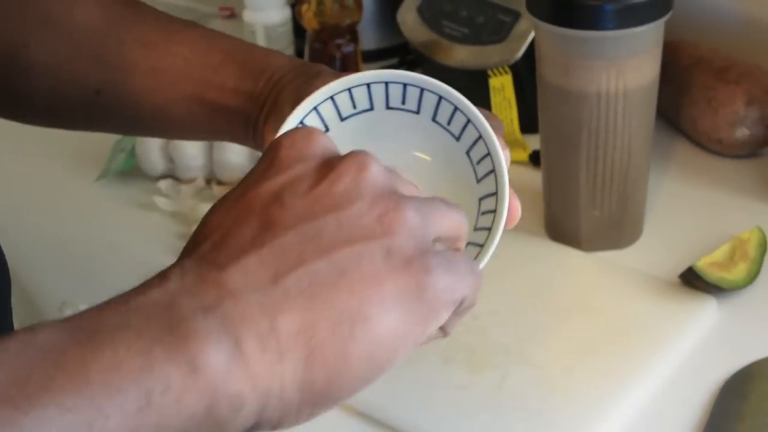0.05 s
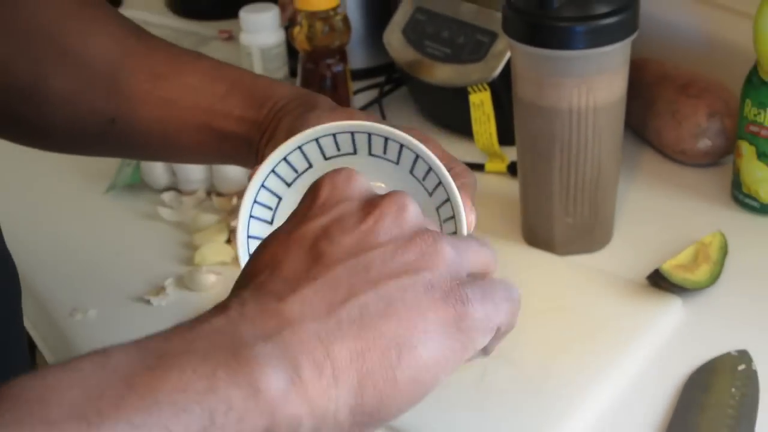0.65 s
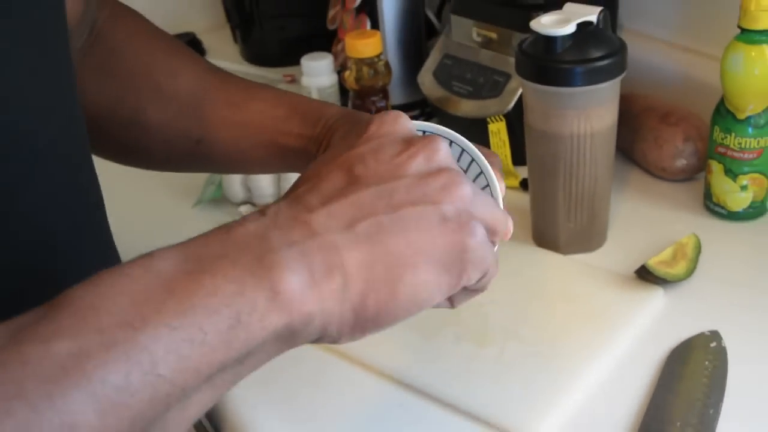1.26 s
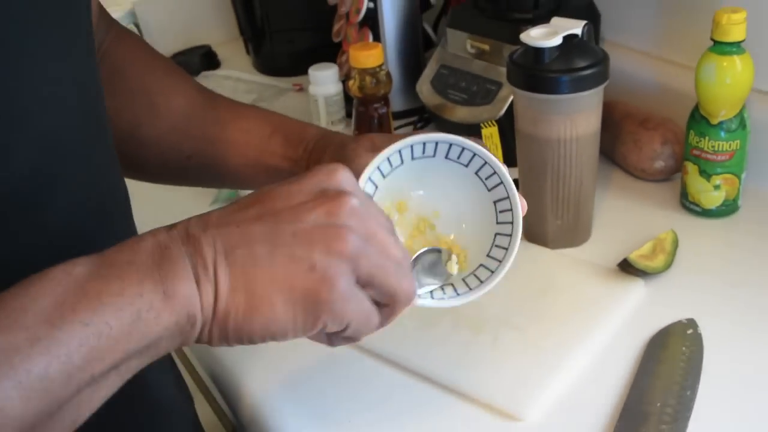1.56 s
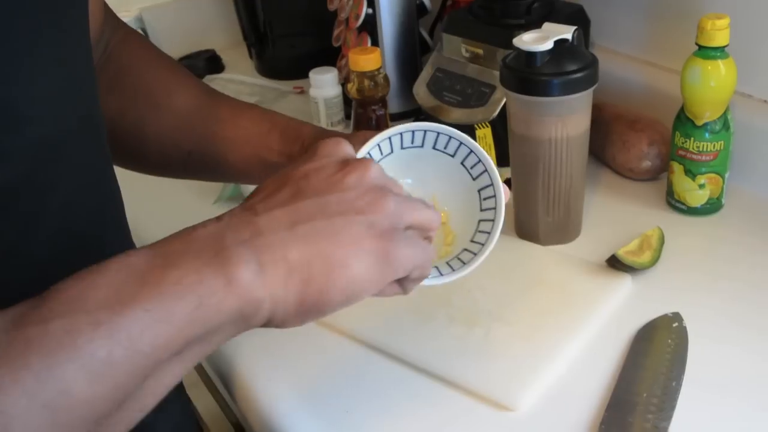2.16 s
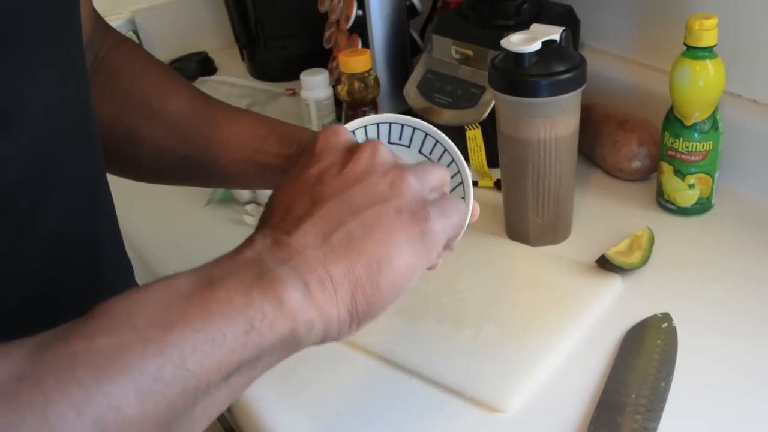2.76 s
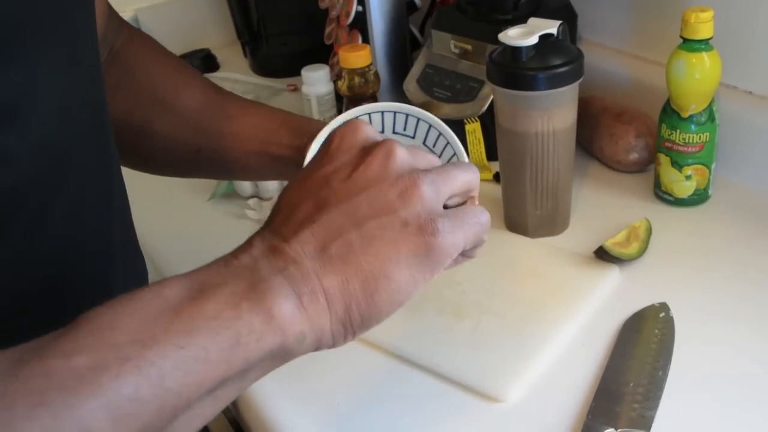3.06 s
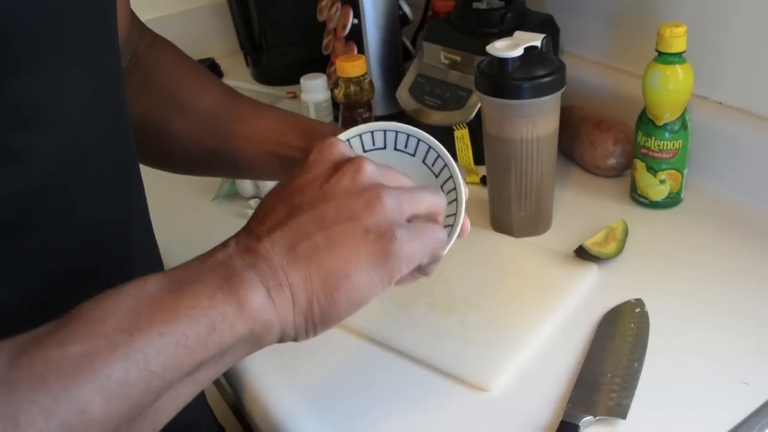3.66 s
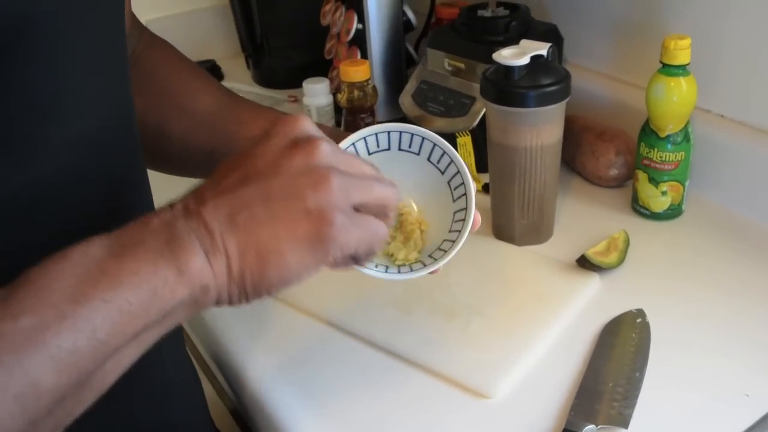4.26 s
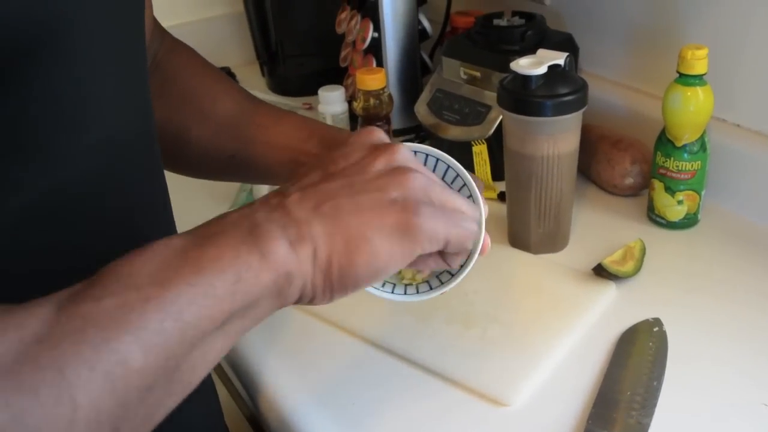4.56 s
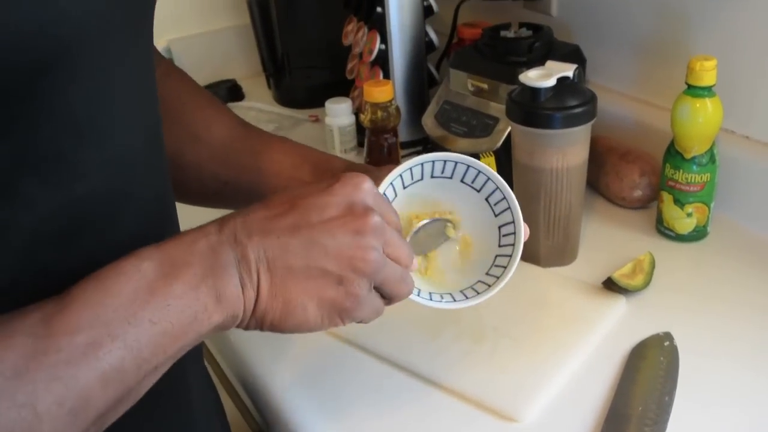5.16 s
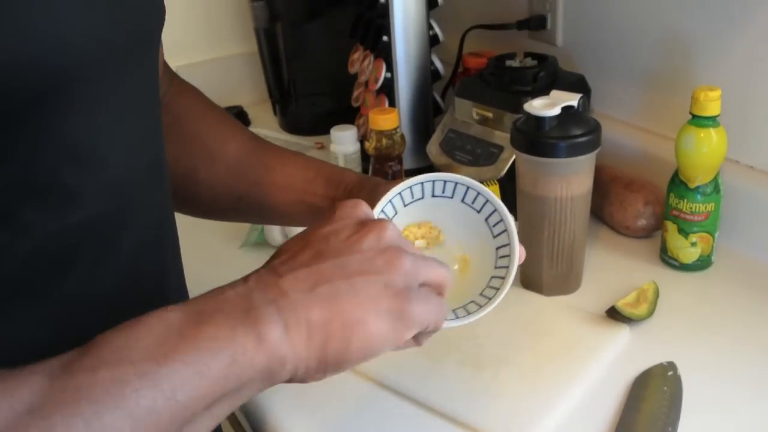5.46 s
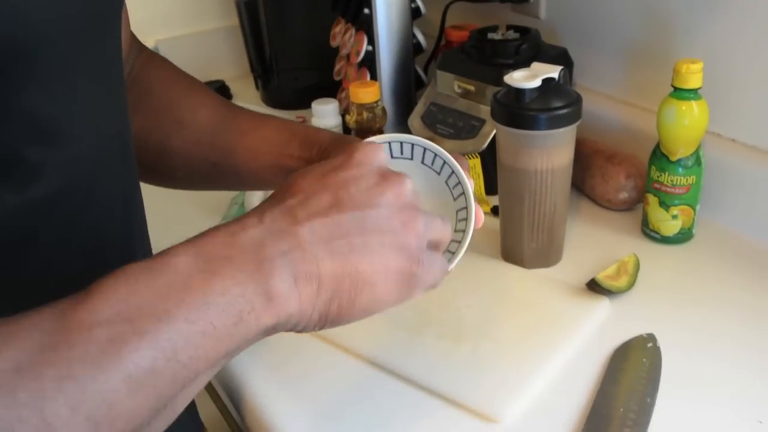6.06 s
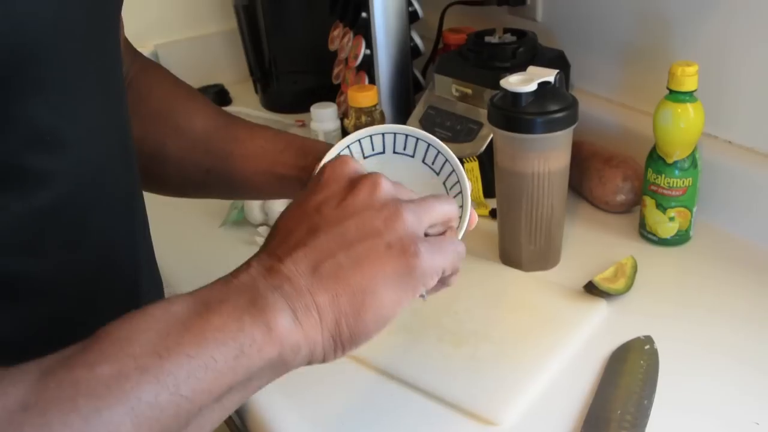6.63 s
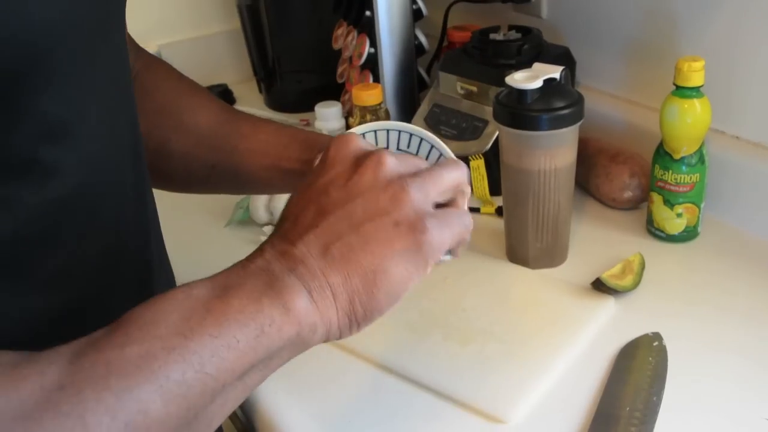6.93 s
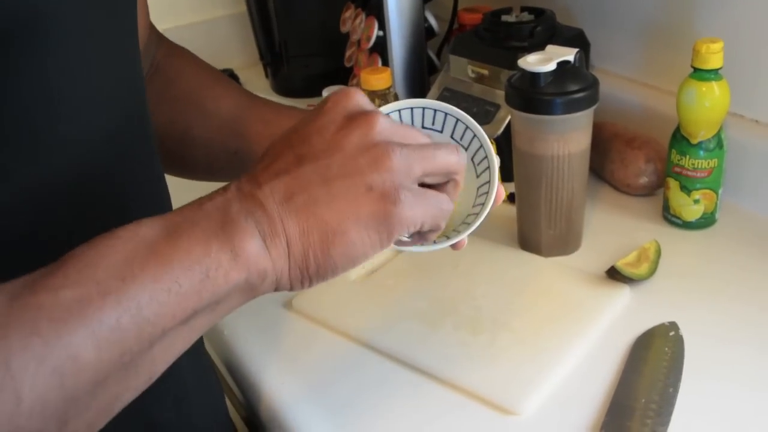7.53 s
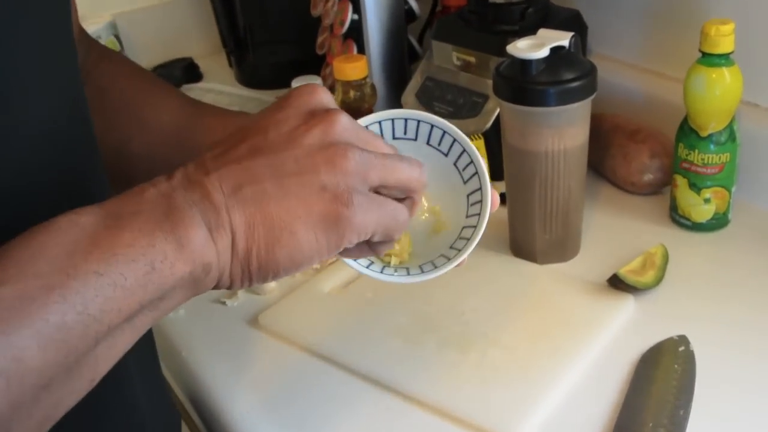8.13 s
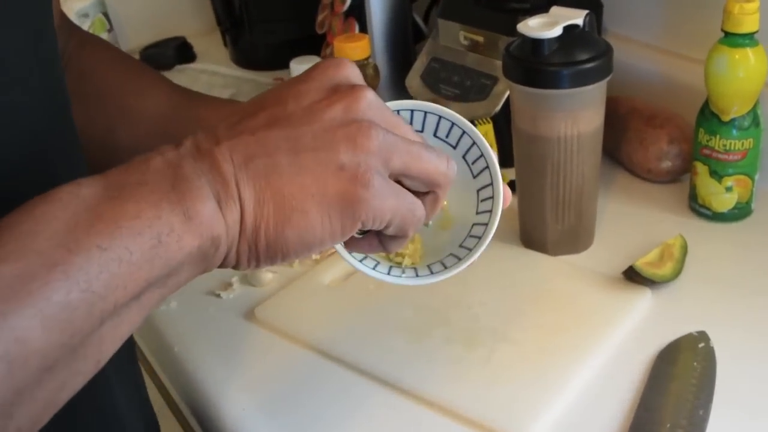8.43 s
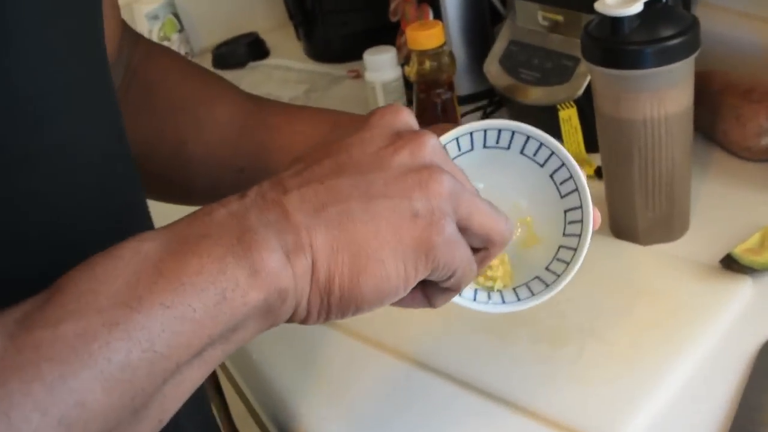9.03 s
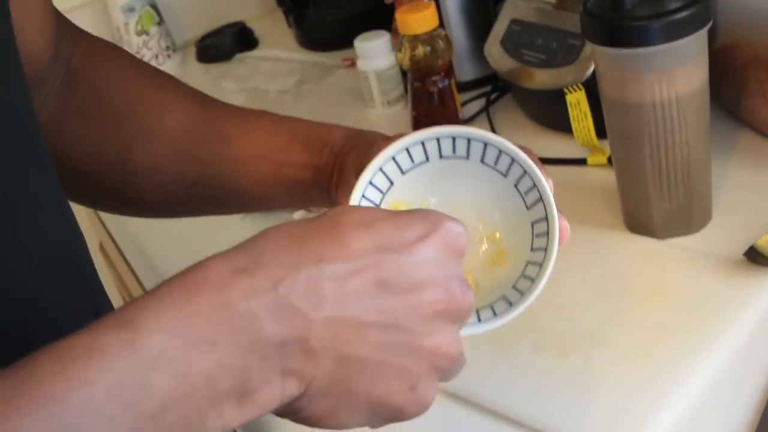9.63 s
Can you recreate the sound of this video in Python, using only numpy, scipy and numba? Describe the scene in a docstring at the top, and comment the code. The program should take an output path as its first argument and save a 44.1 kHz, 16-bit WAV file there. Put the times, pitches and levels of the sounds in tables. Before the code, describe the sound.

Soft wet crackling and a few light knocks start things off as paste is stirred in a small ceramic bowl. The metal spoon then hits harder, mixing bright clinks and dull knocks with brief rasping scrapes on the glaze. It ends with quieter, longer strokes gathering the paste. Everything is close, with a little kitchen reverberation and a faint, steady appliance hum.

```python
"""Over a faint appliance hum, sticky paste ticks and plops as a metal spoon works it round a bowl.
The bowl is small, ceramic and hand-held, in a kitchen, close to the microphone. Threads of paste
snap and air pockets open. The spoon scrapes the wall in a hail of tiny slips, and its knocks and
clinks ring bowl and spoon. At this distance the hardest blows overload the limiter."""
import sys
import numpy as np
from scipy import signal
from scipy.fft import rfft, irfft
from scipy.io import wavfile
from numba import njit

SR = 44100
rng = np.random.default_rng(int(sys.argv[2]) if len(sys.argv) > 2 else 0)


def log_audio(samples):
    """Write samples as a 16-bit WAV file to the path given in sys.argv[1]."""
    # one column per channel
    frames = np.atleast_2d(samples).T
    # limit to full scale, then quantise
    limited = np.clip(frames, -1, 1)
    pcm = np.round(limited * 32767).astype(np.int16)
    wavfile.write(sys.argv[1], SR, pcm)


N = 436140

# spectral shape of the kitchen's hiss: frequency_hz, relative_db
HISS_SHAPE = [(12, -35), (20, -27.5), (33, -26.5), (193, -22.5), (348, -18), (396, -12), (439, -18),
              (474, -15), (3030, -21.5), (9400, -32.5), (12200, -100), (20700, -120)]
# how alike the hiss is in left and right: frequency_hz, correlation
HISS_LIKENESS = [(60, 0.44), (240, 0.76), (950, 0.21), (3770, 0.18), (15000, 0.17)]
# tones of the appliance: pitch_hz, rms_db
HUM_TONES = [(105, -90.5), (193, -72), (240, -74), (395, -71.5)]
# how long the kitchen's walls reverberate: frequency_hz, t60_s
KITCHEN_DECAY = [(150, 0.085), (400, 0.35), (1000, 0.5), (2500, 0.54), (5000, 0.45), (9000, 0.41)]
# how alike the echoes are in left and right: frequency_hz, correlation
ECHO_LIKENESS = [(200, 1), (1000, 0.9), (2000, 0.75), (3500, 0.13), (6500, 0.05), (9000, 0.18)]
# the loudest sticky threads snap: start_s, level_db (before trim), pitch_hz
THREAD_SNAPS = [(0.0506, -31.5, 8300), (0.0747, -32.5, 7500), (0.31, -34, 4760), (0.7818, -35, 3330),
                (2.0822, -35.5, 4500), (2.9345, -30, 8300), (3.71, -22.5, 5030), (4.8138, -33, 3920),
                (5.0498, -37, 2730), (5.134, -37, 2880), (5.5349, -30.5, 3900)]
# the largest air pockets open: start_s, level_db (before trim), pitch_hz
AIR_POCKETS = [(0.587, -40, 775), (0.989, -36, 705), (1.268, -37.5, 322), (1.324, -42, 700),
               (1.433, -37, 314), (1.549, -40.5, 390), (1.841, -38, 1080), (7.968, -36.5, 690),
               (8.568, -37, 715), (9.091, -40.5, 596)]
# how briskly the paste is worked: time_s, pops_per_s
CRACKLE_RATE = [(0, 53.7), (1.4, 20.9), (2.1, 43), (2.6, 16.6), (5.4, 25.6), (5.65, 2), (8.3, 14),
                (8.9, 1.8), (9.2, 18)]
# resonances of the hand-damped bowl and of the gripped spoon: pitch_hz, gain_db, t60_s
BOWL_MODES = [(972, -3, 0.082), (1147, 11, 0.087), (1254, 8, 0.012), (1897, -5, 0.033), (2144, 0, 0.024),
              (3000, -6, 0.0053), (4166, 8.5, 0.046), (7550, 6.5, 0.0088), (8900, 12, 0.048)]
SPOON_MODES = [(1523, 13.6, 0.046), (1630, 11.4, 0.16), (2490, 1.6, 0.019), (3639, 16.3, 0.049),
               (3754, 10, 0.05), (6400, 7.2, 0.092), (6470, 21.7, 0.039), (6574, 21.7, 0.053),
               (6940, 5.3, 0.12), (8000, 4.6, 0.01), (8440, 8, 0.099)]
# how the bowl radiates any contact: frequency_hz, gain_db
BOWL_RADIATION = [(60, 2), (200, 1.5), (450, 3.5), (800, 2.5), (1300, 4), (2500, 4.5), (4500, 10),
                  (5700, 8), (6450, 8), (7200, 8.5), (9200, 3.5)]
# short strokes on the glaze: start_s, length_s, level_db (before trim), ring_db, spoon_share, hollow_hz
SHORT_STROKES = [(0.223, 0.041, -48.5, 7, 0.8, 1750), (0.828, 0.1, -43, -1, 0.4, 4460),
                 (1.653, 0.16, -35.5, 24, 0.24, 2020), (2.13, 0.15, -49, 15, .4, 4370),
                 (2.4, 0.18, -53.5, -1, 0.9, 3540), (3.311, 0.18, -33.5, -6, 0.53, 1820),
                 (3.678, 0.11, -37.5, -1, 0.03, 2320), (4.078, 0.033, -19.5, 5, 0.83, 1670),
                 (4.314, .096, -32, 19, 0.42, 2680), (4.701, 0.073, -47, 1, 0.4, 4400),
                 (5.253, 0.074, -45.5, 5, 0.07, 4480), (5.39, 0.15, -52, -11, 0, 3960),
                 (5.98, 0.19, -39.5, -15, 0.5, 3170), (6.17, 0.27, -41, -3, 0.74, 1680),
                 (6.294, 0.061, -33, 10, 0.3, 1710), (7.025, 0.031, -21, 1.5, 0.03, 1190),
                 (7.338, 0.081, -29, 10, 0, 1160), (7.415, 0.077, -32.5, 8.5, 0.24, 2480),
                 (7.759, 0.15, -32.5, 8, 0.63, 1690)]
# spoon strikes bowl: start_s, level_db (energy over 10 ms), centre_hz, ring_db, spoon_share, hollow_hz
SPOON_BLOWS = [(0.8155, -41, 3600, 3, 0, 4100), (0.8504, -27, 2400, -3, 0.65, 1560),
               (1.0928, -15, 2050, -9, 0, 4460), (1.6629, -36.5, 1530, 0.5, 0.4, 2020),
               (2.7757, -21.5, 2430, 9.5, 0.65, 2630), (3.2856, -7.5, 4520, 0, 0.91, 2620),
               (3.6019, -24.5, 1340, 10.5, 0.23, 2480), (4.0018, -6.5, 2540, -3, 1, 3580),
               (4.2721, -9.5, 2660, -17.5, 0.62, 2400), (4.6677, -39.5, 2767, 25, 0.03, 3250),
               (5.9639, -16.5, 1530, 7, 0.12, 2590), (6.5778, -3, 3870, 7, 0.71, 6400),
               (6.9319, -10, 1580, -16, 0, 4150), (7.0813, -17.5, 4930, 8.5, 1, 6550),
               (7.147, -33, 2930, 6.5, 1, 3600), (7.3096, -16, 1320, 8, 0.12, 2050),
               (7.7366, -5.5, 3670, -1, 0.55, 1640), (8.0971, -16.5, 1564, -10, 0, 1720),
               (8.631, -19.5, 1310, -0.5, 0, 1960), (9.3553, -31.5, 1740, 3.5, 0.7, 1400),
               (9.82, -39, 2420, 0.5, .9, 2450)]
# the spoon climbs the bare wall: time_s, level_db (before trim), hollow_hz
WALL_CLIMB = [(4.865, -48, 1400), (4.91, -38.5, 1400), (4.97, -44, 2550), (5.07, -41.5, 2900),
              (5.11, -48, 2900), (5.18, -50, 3150), (5.26, -58, 3540)]
# two long drags gather the paste, one curve each: time_s, level_db (before trim)
GATHERING_DRAGS = [
    [(7.9, -54), (8.03, -42), (8.17, -46), (8.32, -50.5), (8.55, -62)],
    [(9.08, -67), (9.11, -48), (9.2, -53), (9.25, -41.5), (9.32, -51.5), (9.45, -45.5), (9.7, -49),
     (9.89, -51)],
]
# stereo balance at the microphone: frequency_hz, left_minus_right_db
MIC_BALANCE = [(100, -3), (1200, -2.5), (4000, -1), (6500, -3.5), (8500, -3.5)]
# the recorder's treble roll-off: frequency_hz, gain_db
TREBLE_ROLLOFF = [(9700, 0), (12500, -1), (16000, -12)]

WALL_CRACK_DB = -6  # the bowl beams each crack at the microphone, so less of it reaches the walls


def amp(db):
    """Decibels to gain."""
    return 10 ** (np.asarray(db) / 20)


def unit_rms(x):
    """Scales to rms 1."""
    return x / np.sqrt(np.mean(x ** 2) + 1e-20)


def read(points, hz):
    """Reads a table on a log-frequency axis."""
    table_hz, value = np.transpose(points)
    return np.interp(np.log(hz + 1), np.log(table_hz + 1), value)


def add(mix, start_s, sound):
    """Mixes a sound in at start_s."""
    part = mix[:, max(round(start_s * SR), 0):][:, :sound.shape[1]]
    part += sound[:, :part.shape[1]]


def stereo_pair(spectra, likeness):
    """Turns two unrelated spectra into a left and right with the given correlation."""
    mid = np.sqrt((1 + likeness) / 2) * spectra[0]
    side = np.sqrt((1 - likeness) / 2) * spectra[1]
    return np.array([mid + side, mid - side])


def room_tone(hiss_db=-53.5, waver=0.098):
    """The kitchen's background: even hiss and the wavering hum of an appliance."""
    hz, t = np.fft.rfftfreq(N, 1 / SR), np.arange(N) / SR
    noise = stereo_pair(rfft(rng.standard_normal((2, N))), read(HISS_LIKENESS, hz))
    out = amp(hiss_db) * unit_rms(irfft(noise * amp(read(HISS_SHAPE, hz)), N))
    knots_s = np.linspace(0, t[-1], 80)
    for pitch_hz, db in HUM_TONES:
        wander = rng.standard_normal(len(knots_s)) + 1j * rng.standard_normal(len(knots_s))
        drift = 1 + waver * np.interp(t, knots_s, wander)  # in level and phase
        out += amp(db) * np.sqrt(2) * (drift * np.exp(2j * np.pi * pitch_hz * t)).real
    return out


def kitchen(direct, to_walls, room_db, flutter_db=-6, flutter_t60_s=0.046, gap_s=0.00079, rise_s=0.0016):
    """Close direct sound, a flutter off bowl, hand and counter, then the walls; new echoes each time."""
    t = np.arange(SR // 2) / SR
    taps = rng.choice([-1., 1.], (2, len(t))) * (rng.random((2, len(t))) < 1 / 4)
    hz, frame_s, echoes = signal.stft(taps, SR, nperseg=256)
    echoes = stereo_pair(echoes, read(ECHO_LIKENESS, hz)[:, None])
    flutter = signal.istft(echoes, SR, nperseg=256)[1][:, :len(t)]
    flutter *= amp(-60 * t / flutter_t60_s) * (t > gap_s)
    near = amp(flutter_db) * unit_rms(flutter) / np.sqrt(len(t))
    near[:, 0] += 1  # the straight path to the microphone
    wall_decay = amp(-60 * frame_s / read(KITCHEN_DECAY, hz)[:, None])
    walls = signal.istft(echoes * wall_decay, SR, nperseg=256)[1][:, :len(t)]
    walls *= np.minimum(t / rise_s, 1) ** 2
    walls = amp(room_db) * unit_rms(walls) / np.sqrt(len(t))
    close = signal.fftconvolve(direct[None], near, axes=1)
    return close + signal.fftconvolve(to_walls[None], walls, axes=1)


def pop(peak_db, pitch_hz, decay_cycles, glide=0.13):
    """A few quickly dying cycles with a soft start; the pitch rises as the pocket shrinks."""
    turns = pitch_hz * np.arange(SR // 25) / SR
    envelope = turns * np.exp(-turns / decay_cycles)
    wave = envelope * np.sin(2 * np.pi * turns * (1 + glide * np.minimum(turns, 4)))
    return (amp(peak_db) * wave / abs(wave).max())[None]


def paste(snap_trim_db=2, plop_trim_db=-3, snap_cycles=0.35, plop_cycles=0.4, pocket_share=0.16):
    """Threads snap and air pockets plop: a few large ones over a fine random crackle."""
    out = np.zeros((1, N))
    for start_s, db, pitch_hz in THREAD_SNAPS:
        add(out, start_s, pop(db + snap_trim_db, pitch_hz, snap_cycles))
    for start_s, db, pitch_hz in AIR_POCKETS:
        add(out, start_s, pop(db + plop_trim_db, pitch_hz, plop_cycles))
        add(out, start_s + 0.00389, pop(db - 3, pitch_hz=593, decay_cycles=0.7))  # the paste closes again
    t = np.arange(N) / SR
    starts_s = t[rng.random(N) < np.interp(t, *np.transpose(CRACKLE_RATE)) / SR]
    for start_s, (kind, pitch, rarity) in zip(starts_s, rng.random((len(starts_s), 3))):
        extra_db = 4 * min(-np.log(rarity), 3)
        if kind < pocket_share:
            add(out, start_s, pop(-54 + extra_db, np.interp(pitch, [0, 1], [500, 950]), plop_cycles))
        else:
            add(out, start_s, pop(-47.5 + extra_db, np.interp(pitch, [0, 1], [2000, 8000]), snap_cycles))
    return kitchen(out[0], out[0], room_db=-9)[:, :N]


def ringing(modes, t, detune=0.008):
    """Impulse response of decaying modes; the grip detunes them slightly each time."""
    hz, db, t60_s = np.transpose(modes)[:, :, None]
    damping = np.log(1000) / t60_s
    hz = hz * (1 + detune * rng.standard_normal(hz.shape))
    return (amp(db) * 2 * damping / SR * np.exp(-damping * t) * np.cos(2 * np.pi * hz * t)).sum(0)


def contact(centre_hz, fall_db_per_octave, ring_db, spoon_share, size=4096):
    """One push-pull pressure pulse and its ring, from all bowl (spoon_share 0) to all spoon (1)."""
    hz, t = np.fft.rfftfreq(size, 1 / SR), np.arange(size) / SR
    ratio = (hz + 1) / centre_hz
    treble_loss_db = (fall_db_per_octave + 6) / 4 * np.log2(1 + ratio ** 4)
    db = read(BOWL_RADIATION, hz) + 20 * np.log10(ratio) - treble_loss_db
    log_gain = np.log(amp(np.r_[db, db[-2:0:-1]]))
    crack = np.fft.ifft(np.exp(np.conj(signal.hilbert(log_gain)))).real  # causal phase
    modes = (1 - spoon_share) * ringing(BOWL_MODES, t) + spoon_share * ringing(SPOON_MODES, t)
    return crack, signal.fftconvolve(crack, amp(ring_db) * modes)[:size]


def hollow(x, hz, db, t60_cycles=28):
    """The spoon's hollow against the wall: a resonance whose pitch moves with where and how it lies."""
    carrier = np.exp(2j * np.pi * np.cumsum(hz * np.ones(len(x))) / SR)
    pole = np.exp(-np.log(1000) * np.mean(hz) / t60_cycles / SR)
    return 2 * amp(db) * (carrier * signal.lfilter([1 - pole], [1, -pole], x / carrier + 1e-18)).real


def rub(pressure, hollow_hz, ring_db, spoon_share, brightness=1, slips_per_s=950, trim_db=-2):
    """Metal rubbing on glaze is a hail of tiny uneven slips, each ringing like a small blow."""
    n, mean_hz = len(pressure), np.mean(hollow_hz)
    slipping = rng.random(n) < slips_per_s / SR
    slip_db = 2.6 * np.minimum(rng.exponential(1, n), 3)
    slips = unit_rms(slipping * amp(slip_db) * rng.choice([-1, 1], n))
    # a tighter hollow means a smaller, brighter contact
    centre_hz = brightness * 1806 * (mean_hz / 2200) ** 0.27
    crack, ring = contact(centre_hz, fall_db_per_octave=11, ring_db=ring_db, spoon_share=spoon_share)
    hollow_db = 6.5 + ring_db
    one_slip = crack + ring + hollow(crack, mean_hz, hollow_db)
    force = amp(trim_db) * slips * pressure / np.linalg.norm(one_slip)
    rasp = signal.fftconvolve(force, crack)
    glide_hz = np.pad(hollow_hz * np.ones(n), (0, len(rasp) - n), "edge")
    singing = signal.fftconvolve(force, ring) + hollow(rasp, glide_hz, hollow_db)
    return kitchen(rasp + singing, amp(WALL_CRACK_DB) * rasp + singing, room_db=-4)


def scrapes(skew=0.69):
    """Short strokes: the pressure swells and lets go in one arch that peaks a little early."""
    out = np.zeros((2, N))
    for start_s, length_s, db, ring_db, spoon_share, hollow_hz in SHORT_STROKES:
        progress = np.arange(0, length_s, 1 / SR) / length_s
        pressure = amp(db) * np.sin(np.pi * progress ** skew)
        add(out, start_s, rub(pressure, hollow_hz, ring_db, spoon_share))
    return out


def blows():
    """The spoon strikes the wall: dull knocks ring the bowl, bright clinks ring the spoon."""
    out = np.zeros((2, N))
    for start_s, db, centre_hz, ring_db, spoon_share, hollow_hz in SPOON_BLOWS:
        bounce = (spoon_share * amp(ring_db)) ** 2
        fall_db_per_octave = 9 + 4.5 * bounce  # a freely bouncing spoon rounds the pulse
        crack, ring = contact(centre_hz, fall_db_per_octave, ring_db, spoon_share)
        ring = ring + hollow(crack, hollow_hz, db=8.5 + 0.85 * ring_db)
        gain = amp(db) * np.sqrt(SR / 100) / np.linalg.norm(crack + ring)
        room_db = -5 - 0.117 * db  # softer blows carry more of the room
        add(out, start_s, gain * kitchen(crack + ring, amp(WALL_CRACK_DB) * crack + ring, room_db))
    return out


def follow(curve):
    """Start time of a curve, then each of its columns sample by sample."""
    time_s, *columns = np.transpose(curve)
    t = np.arange(time_s[0], time_s[-1], 1 / SR)
    return time_s[0], *(np.interp(t, time_s, column) for column in columns)


def drags():
    """Long strokes: one sings up the bare wall, two more are muffled by paste."""
    out = np.zeros((2, N))
    start_s, db, hollow_hz = follow(WALL_CLIMB)
    add(out, start_s, rub(amp(db), hollow_hz, ring_db=4, spoon_share=0.27, brightness=1.14))
    for start_s, db in map(follow, GATHERING_DRAGS):
        add(out, start_s, rub(amp(db), hollow_hz=1330, ring_db=-20, spoon_share=0.6))
    return out


def scene():
    """Bowl and kitchen from the microphone's position, a little stronger on the right."""
    mix = blows() + scrapes() + drags() + paste() + room_tone()
    lean_db = read(MIC_BALANCE, np.fft.rfftfreq(N, 1 / SR)) / 2
    return irfft(rfft(mix) * amp([lean_db, -lean_db]), N)


def lowpass(x, hz):
    """Steep band limit."""
    return signal.oaconvolve(x, signal.firwin(255, hz, window=("kaiser", 8), fs=SR)[None], "same")


@njit
def limiter(peak, ceiling, attack, release):
    """Gain falls fast while the peak exceeds the ceiling and creeps back to one."""
    gains, gain = np.ones(len(peak)), 1.
    for i in range(len(peak)):
        if peak[i] * gain > ceiling:
            gain += (ceiling / peak[i] - gain) * attack
        else:
            gain += (1 - gain) * release
        gains[i] = gain
    return gains


def record(dry, dc_offset=0.0023, ceiling=0.85, attack_s=0.000092, release_s=0.11):
    """A narrow-band microphone feeds a limiter whose overshoot clips; the recorder rolls off the top."""
    mic = lowpass(dry, hz=9650) + dc_offset
    attack, release = 1 - np.exp(-1 / (attack_s * SR)), 1 / (release_s * SR)
    gain = limiter(abs(mic).max(0), ceiling, attack, release)
    clipped = np.clip(mic * gain, -1, 1)
    rolloff = amp(read(TREBLE_ROLLOFF, np.fft.rfftfreq(N, 1 / SR)))
    return lowpass(irfft(rfft(clipped) * rolloff, N), hz=16400)


dry = scene()
out = record(dry)
log_audio(out)
```